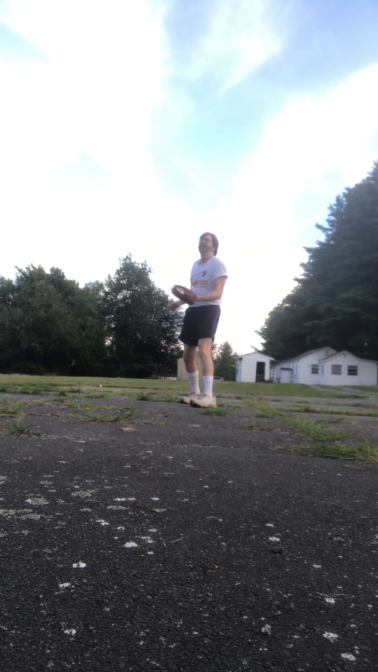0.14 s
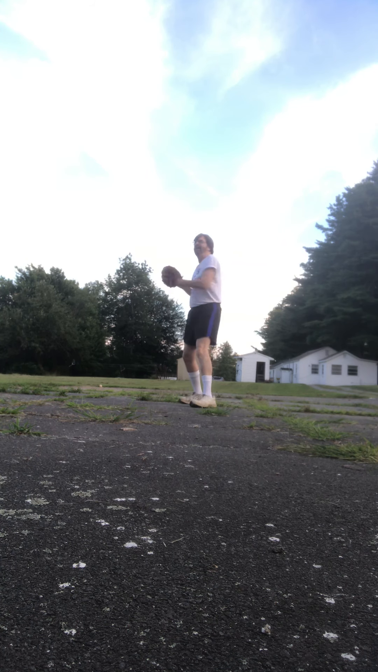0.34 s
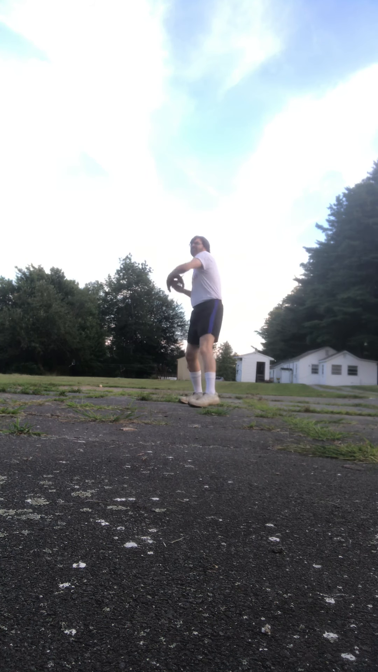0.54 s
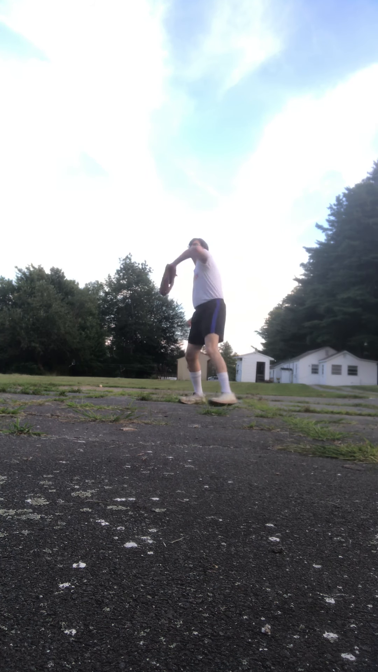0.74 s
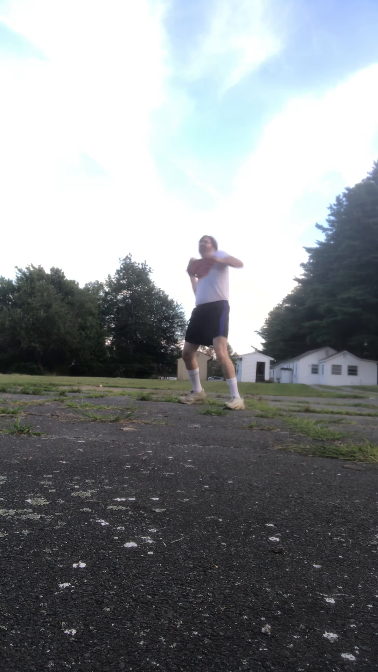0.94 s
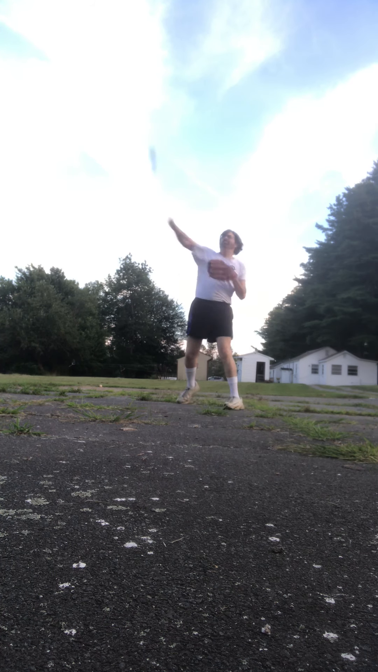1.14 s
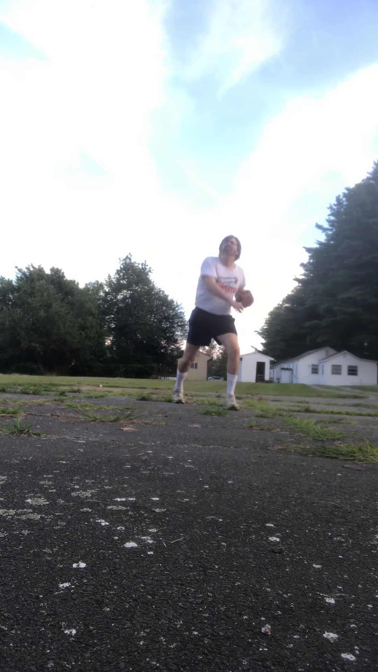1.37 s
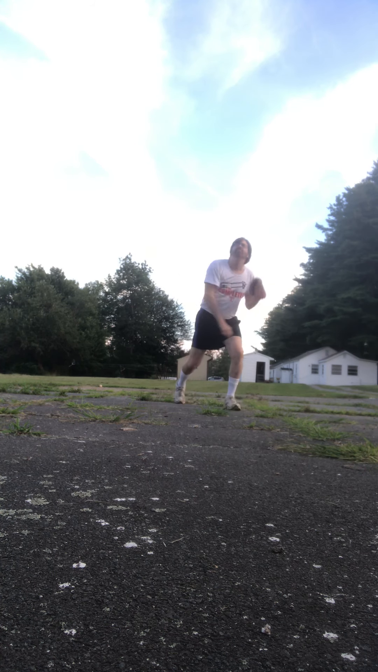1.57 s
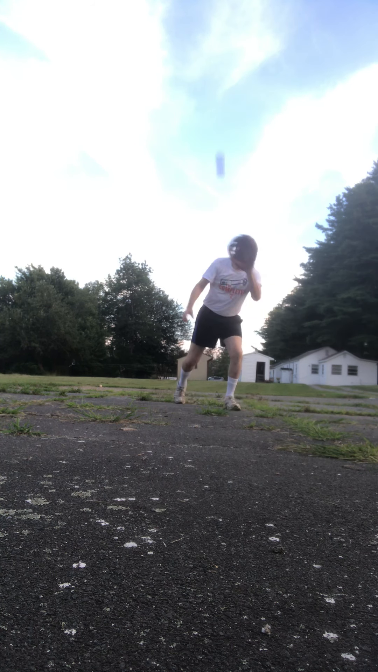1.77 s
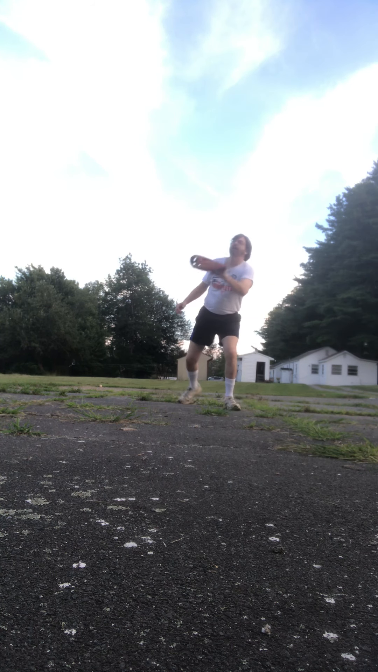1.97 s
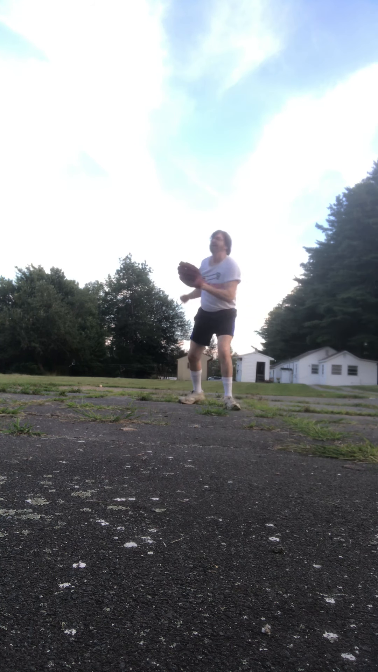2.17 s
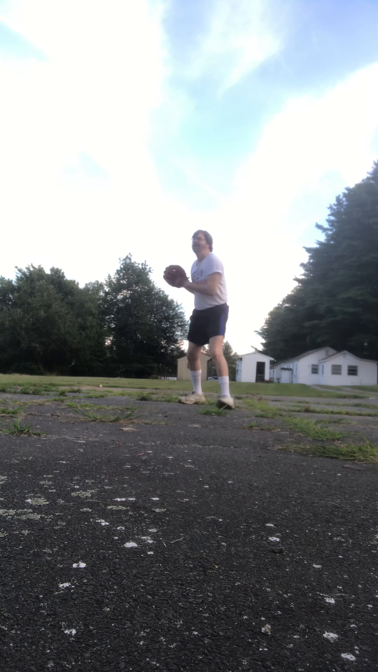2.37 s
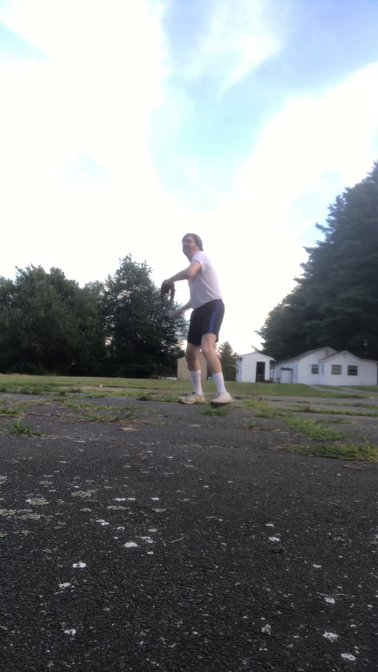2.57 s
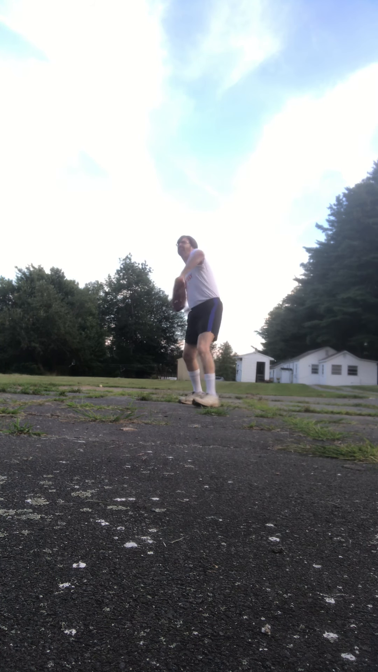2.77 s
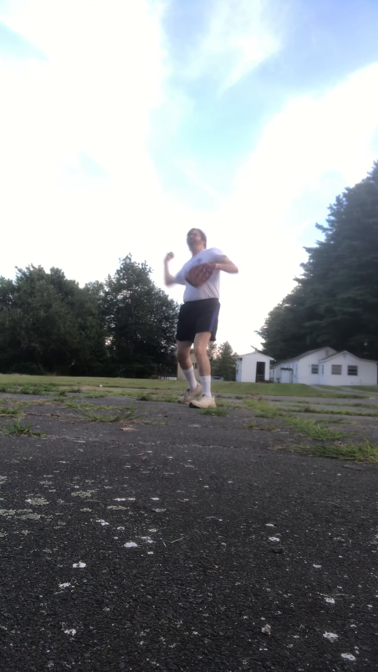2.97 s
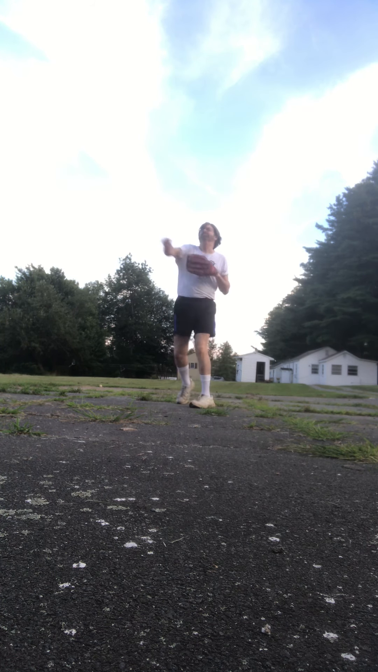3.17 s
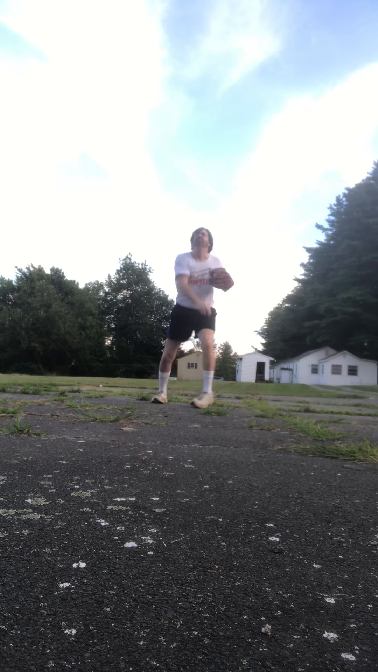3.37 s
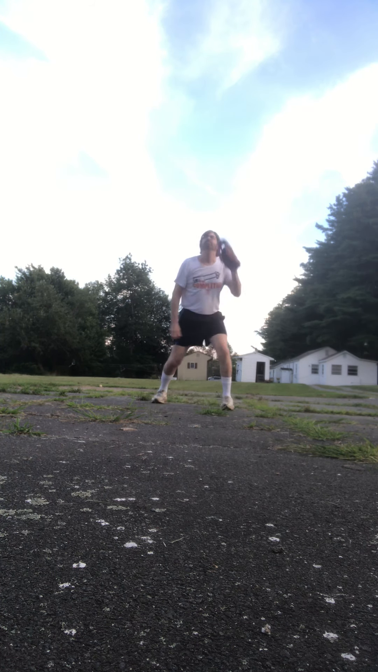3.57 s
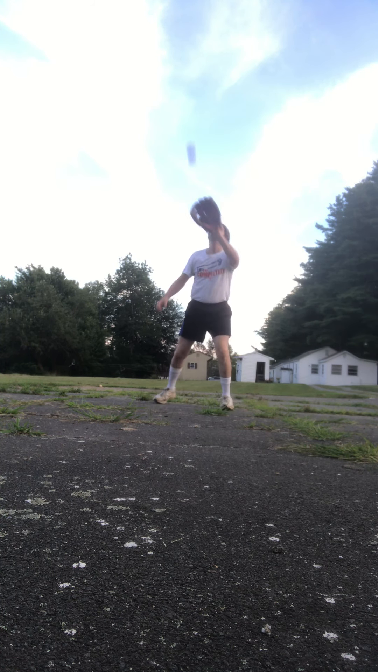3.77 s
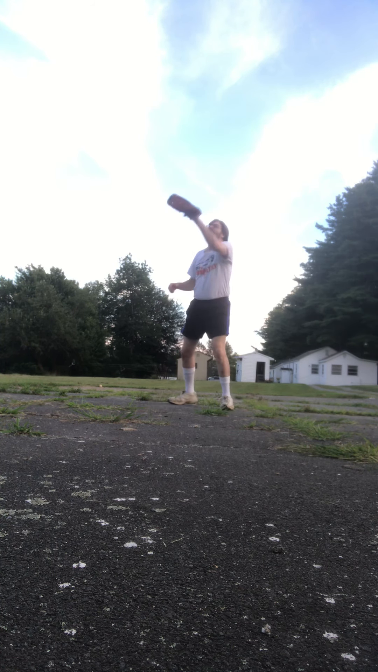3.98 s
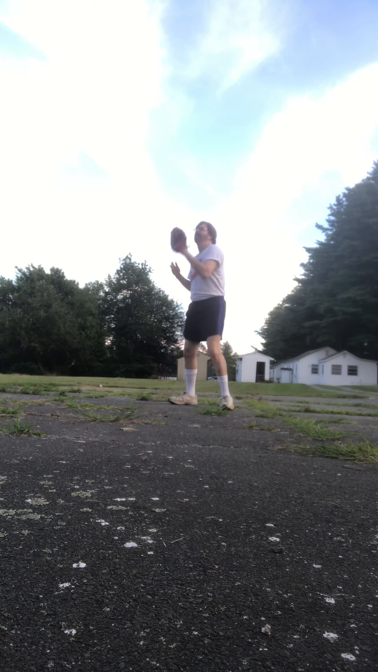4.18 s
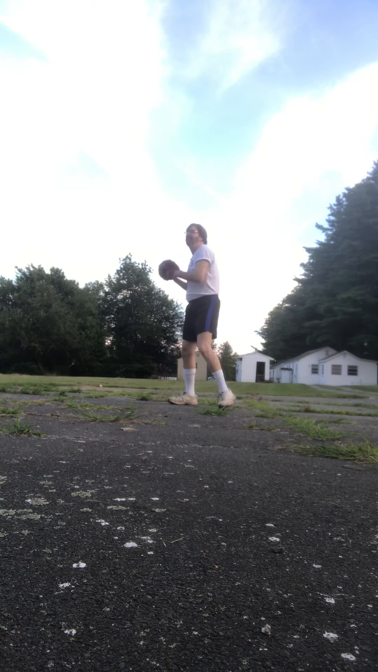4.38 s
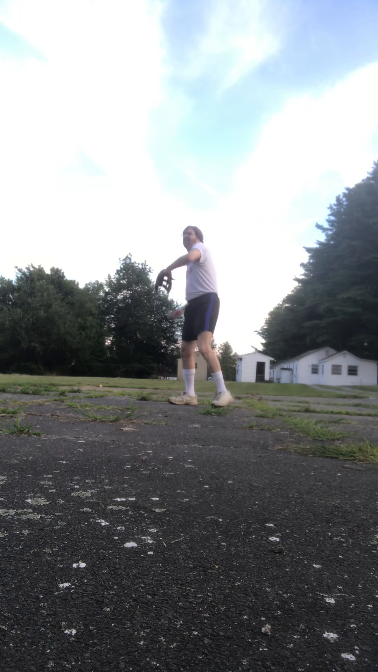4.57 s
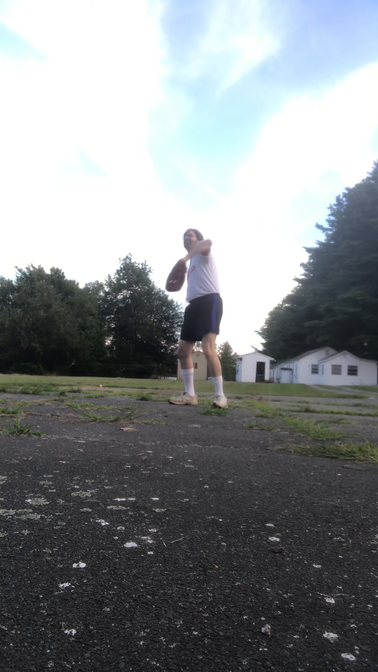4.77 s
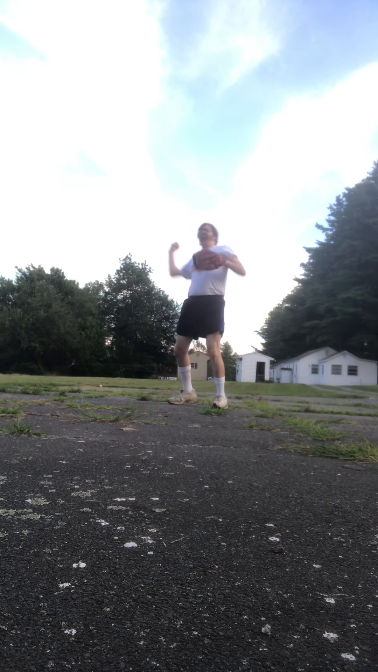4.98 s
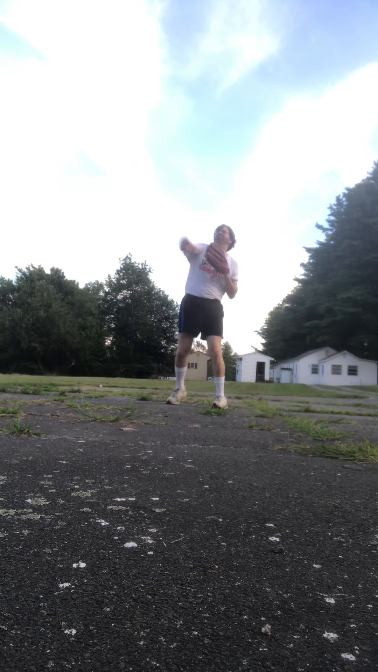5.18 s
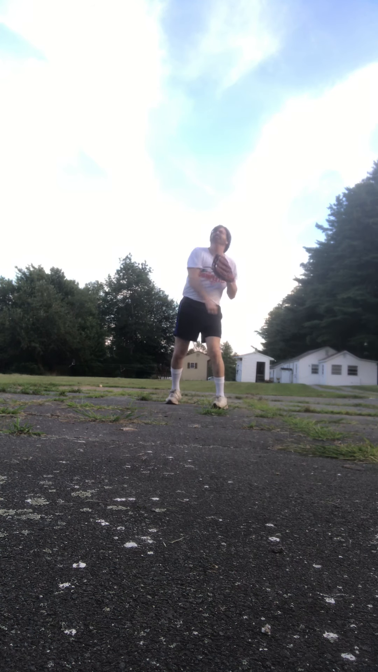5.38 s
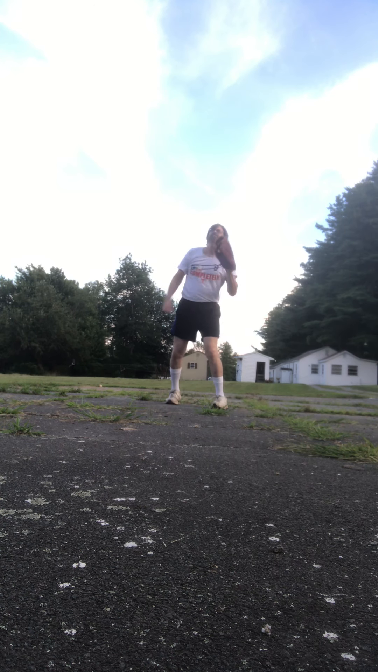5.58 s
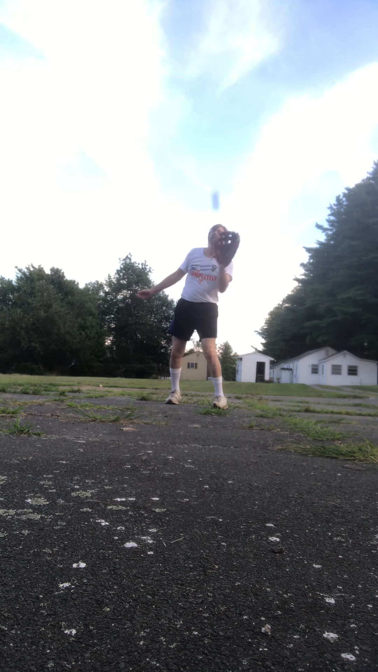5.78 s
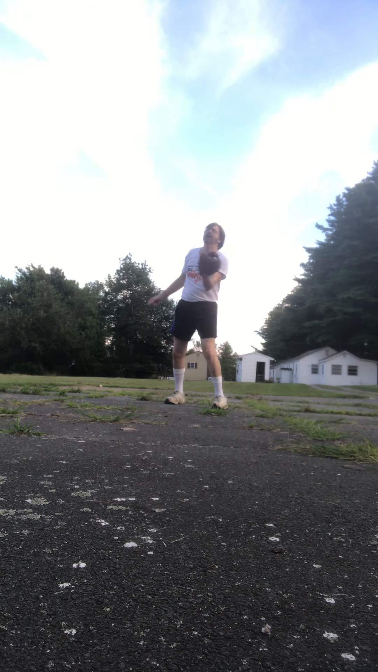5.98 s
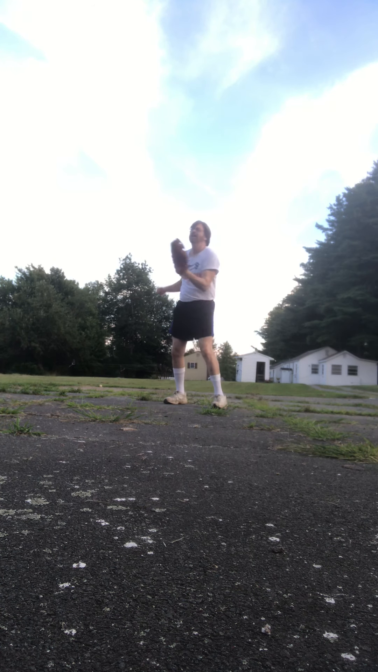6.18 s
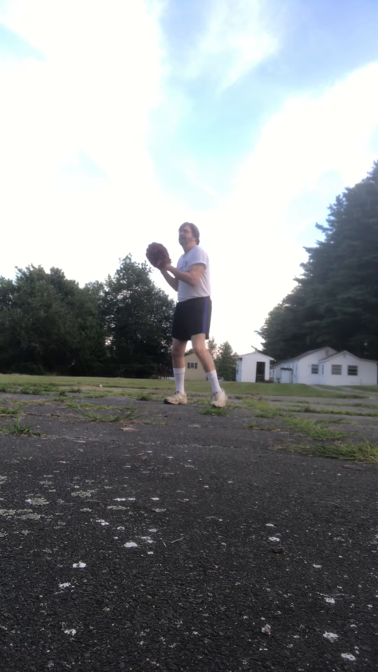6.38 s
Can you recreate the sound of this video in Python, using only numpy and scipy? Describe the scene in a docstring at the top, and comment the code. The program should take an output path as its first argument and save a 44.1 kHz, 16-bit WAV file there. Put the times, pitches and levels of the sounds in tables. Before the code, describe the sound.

Three hard throws bang off a panelled wall, each followed by a leather glove catch, with faint shoe scuffs on asphalt.

```python
"""Baseball against a wall

Three throws strike a nearby panelled wall, whose resonances crack and boom, and each rebound pops
in a leather glove. Far buildings and trees reflect the blows; shoes rasp by friction on gritty
asphalt. Behind it all are open air, a distant machine hum, insects and small birds."""
import sys
import numpy as np
from scipy import signal
from scipy.fft import rfft, irfft, next_fast_len
from scipy.io import wavfile
from scipy.ndimage import uniform_filter1d

SR = 44100
rng = np.random.default_rng(int(sys.argv[2]) if len(sys.argv) > 2 else 0)


def store_wav(level_fs):
    """Save 16-bit WAV to argv[1]."""
    pcm = np.round(np.clip(np.atleast_2d(level_fs), -1, 1) * 32767)
    wavfile.write(sys.argv[1], SR, pcm.T.astype(np.int16))


N = 283563
TIME = np.arange(N) / SR


def from_db(db):
    """Amplitude grows tenfold for every 20 dB."""
    return 10 ** (np.asarray(db) / 20)


def rms_one(x):
    """Normalisation to unit mean power."""
    return x / np.sqrt(np.mean(x ** 2) + 1e-20)


def at_hz(points, hz):
    """Interpolation of a spectrum on a log-frequency axis."""
    f, db = np.transpose(points)
    return np.interp(np.log(np.maximum(hz, 1)), np.log(f), db)


def noise(spectrum, size):
    """Spectral shaping turns white noise into coloured noise of rms 1."""
    gain = from_db(at_hz(spectrum, np.arange(size // 2 + 1) * SR / size))
    return rms_one(irfft(rfft(rng.standard_normal(size)) * gain, size))


def resonate(x, hz, width):
    """A two-pole resonator with unit peak gain and a bandwidth in Hz."""
    r = np.exp(-np.pi * width / SR)
    feedback = [1, -2 * r * np.cos(2 * np.pi * hz / SR), r * r]
    return signal.lfilter(np.array([1, 0, -1]) * (1 - r * r) / 2, feedback, x + 1e-18)


def narrow_noise(size, hz, width):
    """Two resonators in cascade narrow white noise to a wavering tone."""
    return resonate(resonate(rng.standard_normal(size), hz, width), hz, width)


def filtered(x, order, hz, kind):
    """A filter with a maximally flat passband."""
    return signal.sosfilt(signal.butter(order, hz, kind, fs=SR, output="sos"), x)


def fade(t, t60):
    """Exponential decay from t = 0, losing 60 dB in t60 seconds."""
    return (t >= 0) * np.exp(-np.log(1000) * np.maximum(t, 0) / t60)


def delay(x, s):
    """A linear phase shift delays a sound by s seconds."""
    size = next_fast_len(2 * len(x))
    hz = np.arange(size // 2 + 1) * SR / size
    return irfft(rfft(x, size) * np.exp(-2j * np.pi * hz * s), size)[:len(x)]


def add(out, s, sound):
    """Superposition: a sound joins the mix at time s."""
    start = max(round(s * SR), 0)
    out[start:start + len(sound)] += sound[:max(N - start, 0)]


def grains(depth_db):
    """Random amplitude modulation, a millisecond or two per grain."""
    return rms_one(from_db(depth_db * rms_one(uniform_filter1d(rng.standard_normal(N), size=70))))


def chirp(s, hz, half_s, arch):
    """A tone pulse under a bell-shaped envelope; its pitch arches around time s."""
    out, near = np.zeros(N), np.abs(TIME - s) < 4 * half_s
    u = (TIME[near] - s) / half_s
    pitch_hz = hz * (1 - arch * u * u)
    out[near] = np.exp(-u * u) * np.sin(2 * np.pi * np.cumsum(pitch_hz) / SR)
    return out


def chance_times(per_s):
    """Jittered timing: one moment falls at random in each equal slot."""
    times = (np.arange(40) + rng.random(40)) / per_s
    return times[times < N / SR]


# spectrum of the open air: frequency_hz, density_db
AIR_SPECTRUM = [(15, -54.5), (25, -19.5), (74, 2), (89, -12), (105, -17.5), (137, -5.5), (175, -17),
                (217, -15), (317, -19.5), (344, -13), (373, -23.5), (1100, -25), (3340, -39), (5430, -42),
                (16000, -53)]
# two bands of distant machinery, one of an insect chorus: pitch_hz, width_hz, level_db
DRONE_BANDS = [(73.6, 29, -55.5), (146.1, 6, -60.5), (5530, 970, -71.5)]
def ambience():
    """Distant sources merge into broadband noise, narrowband drones and a pure hum."""
    air = from_db(-50.5) * noise(AIR_SPECTRUM, N)
    drones = sum(from_db(db) * rms_one(narrow_noise(N + SR, hz, width)[SR:])
                 for hz, width, db in DRONE_BANDS)
    hum = from_db(-64.5) * np.sqrt(2) * np.sin(2 * np.pi * 350 * TIME)
    return air + drones + hum


# bouts of insect calls: start_s, end_s
CALL_BOUTS = [(.015, 3.3), (4.17, 8.1)]
def insect(period_s=.436):
    """Modulation by noise spreads evenly paced, high tone pulses into a narrow band."""
    flutter = rms_one(uniform_filter1d(rng.standard_normal(N), size=200))
    calls = np.concatenate([np.arange(start, end, period_s) for start, end in CALL_BOUTS])
    return from_db(-73.5) * flutter * sum(chirp(s, 8080, half_s=.04, arch=.015) for s in calls)


# chips of the nearest bird: centre_s, level_db
BIRD_CHIPS = [(0.169, -52.5), (.775, -54.5), (2.43, -57)]
def birds():
    """Amplitude modulation roughens the short chips of one near bird and a few far ones."""
    rough = grains(1.7)
    near = [(s, 5260, db) for s, db in BIRD_CHIPS]
    far = [(s, 4900 + 130 * rng.standard_normal(), -61) for s in chance_times(per_s=1.5)]
    return rough * sum(from_db(db) * chirp(s, hz, half_s=.0049, arch=.049) for s, hz, db in near + far)


# reflections from far buildings: delay_s, gain_db
BUILDING_ECHOES = [(.2888, -28.5), (.3526, -32.5), (.3735, -39)]
def far_echoes(x):
    """Reflection from buildings gives thin, distinct echoes; scattering by trees gives a soft smear."""
    thin = filtered(x, 2, [1000, 4500], "band")
    t = TIME[:SR * 3 // 5]
    trees = rng.standard_normal(len(t)) * np.exp(-((t - .375) / .065) ** 2)
    smear = signal.fftconvolve(thin, trees / np.sqrt(np.sum(trees ** 2)))[:N]
    return sum(from_db(db) * delay(thin, s) for s, db in BUILDING_ECHOES) + from_db(-35) * smear


def click(db, hz):
    """A small dry contact radiates a brief burst of noise around one broad resonance."""
    t = TIME[:SR // 16]
    crunch = noise([(300, 3.5), (1500, 3.5), (5000, -1), (8000, -7.5), (16000, -25.5)], len(t))
    rise = 1 - fade(t, .0041)
    decay = fade(t, .014) + from_db(-3.5) * fade(t, .028)
    return from_db(db - 1.5) * rms_one(resonate(crunch, hz, .41 * hz)) * rise * decay


def bump(db, hz, t60):
    """A single, heavily damped mode gives a soft knock."""
    t = TIME[:SR // 8]
    return from_db(db) * np.sin(2 * np.pi * hz * t) * fade(t, t60)


# dull bumps, as of feet landing: start_s, level_db, pitch_hz, t60_s
DULL_BUMPS = [(2.088, -43.5, 392, 0.04), (2.841, -39.5, 190, 0.053), (3.4989, -19.5, 470, 0.016),
              (3.605, -39, 200, 0.12)]
# small dry clicks of grit underfoot, and of the wall rattling just after the second throw:
# start_s, strength_db, pitch_hz
DRY_CLICKS = [(1.275, -41.5, 1446), (2.3065, -34, 1170), (2.367, -34.5, 5400), (2.837, -32, 1950),
              (3.279, -39, 1190), (3.312, -40, 1300), (3.497, -31.5, 1140), (3.5222, -35, 2680),
              (4.482, -37.5, 1110), (4.533, -36.5, 960), (4.8377, -41.5, 1500), (5.0773, -44, 920)]
def small_impacts():
    """Brief contacts: feet land, grit and the rattling wall click, and finer grit ticks at random."""
    out = np.zeros(N)
    for s, db, hz, t60 in DULL_BUMPS:
        add(out, s, bump(db, hz, t60))
    for s, db, hz in DRY_CLICKS:
        add(out, s, click(db, hz))
    for s in chance_times(per_s=4):
        offset_db, pitch = rng.standard_normal(2)
        add(out, s, click(-52 + offset_db, hz=2200 * 2 ** (.34 * pitch)))
    return out


# soles dragging on asphalt: centre_s, half_length_s, level_db, relative_hiss_db
SOLE_DRAGS = [(0.248, 0.087, -59, -8.5), (0.501, 0.019, -56, -20), (1.11, 0.036, -52, -19),
              (1.325, 0.054, -51, -12), (1.406, 0.02, -37, -15.5), (2.346, 0.065, -53, -5),
              (3.112, 0.027, -43, -8), (3.226, 0.025, -53, -1), (3.344, 0.021, -37.5, -14),
              (4.202, 0.03, -53.5, -24), (4.519, 0.019, -42.5, -10.5), (4.614, 0.036, -51.5, -4.5)]
def rubbing(db_per_octave=19, squareness=2.6, grain_limit=2.5):
    """Friction noise, a grainy rasp with hiss: soles, grit trickling off the wall, the closing glove."""
    rasp = noise([(200, -6.5), (500, 9.5), (1000, -2.5), (2500, -4), (4500, -5.5), (8000, -22),
                  (16000, -27)], N)
    hiss = noise([(1200, -19.5), (2500, -5), (4000, -4.5), (6500, 3), (9500, -10), (16000, -15)], N)
    # the lighter the drag, the higher its rasp
    soles = [(s, half_s, db, 920 * 2 ** ((-40.5 - db) / db_per_octave), hiss_db)
             for s, half_s, db, hiss_db in SOLE_DRAGS]
    debris = [(s + .084, .025, -57, 3200, -13.5) for s, *_ in WALL_HITS]
    grips = [(s + .11, .034, -55.5, 1775, -13.5) for s, *_ in GLOVE_HITS]
    out = np.zeros(N)
    for s, half_s, db, hz, hiss_db in soles + debris + grips:
        envelope = np.exp(-np.minimum(np.abs(TIME - s) / half_s, 10) ** squareness)
        out += from_db(db) * envelope * (rms_one(resonate(rasp, hz, .8 * hz)) + from_db(hiss_db) * hiss)
    stones_db = 5 * rng.exponential(1, N // 12 + 1).clip(0, 4)   # single stones snap past
    crackle = rms_one(from_db(np.repeat(stones_db, 12)[:N]))
    return out * rms_one(np.minimum(crackle * grains(3), grain_limit))


def glove_swish():
    """Two bands of noise swell into a hollow swish as the glove comes down after the first catch."""
    rub = rng.standard_normal(N)
    upper = resonate(resonate(rub, 3070, 600), 3040, 510)
    lower = resonate(resonate(rub, 1820, 500), 2030, 600)
    envelope = np.exp(-((TIME - 2.13) / .034) ** 2)
    return from_db(-49) * rms_one(upper + from_db(-1) * lower) * envelope


# the ball shifting after each catch: delay_s, level_db, pitch_hz, t60_s
BALL_SHIFTS = [(.031, -23.5, 364, 0.019), (0.049, -26, 270, 0.015), (.026, -34, 686, 0.032)]
def settling():
    """Secondary impacts: the caught ball ticks against the leather and drops into the pocket."""
    out = np.zeros(N)
    for (s, *_), (after_s, db, hz, t60) in zip(GLOVE_HITS, BALL_SHIFTS):
        add(out, s + after_s - .003, click(db=-41.5, hz=1300))
        add(out, s + after_s, bump(db, hz, t60))
    return out


def contact(t, grit_db, t60):
    """Contact force: a unit impulse, then a brief crunch of the touching surfaces."""
    crunch = filtered(rng.standard_normal(len(t)), 2, 2200, "high")
    return (t == 0) + from_db(grit_db) * crunch * fade(t, t60)


def lead_in(hz, width, t60):
    """A time-reversed decay of narrowband noise: a hollow tone swells for 25 ms before a blow."""
    t = TIME[:SR // 40]
    tone = rms_one(narrow_noise(SR // 10, hz, width)[-len(t):])
    return (tone * fade(t, t60))[::-1]


# spectrum of a blow's diffuse tail: frequency_hz, density_db
TAIL_SPECTRUM = [(60, -16), (150, 6), (400, -0.5), (700, -0.5), (1300, -4), (2200, -7), (4500, -16.5),
                 (7000, -22.5), (11000, -33), (16000, -36.5)]
def diffuse_noise(t):
    """A diffuse sound field behaves as coloured noise."""
    return noise(TAIL_SPECTRUM, len(t))


# points at which a blow's colour is given: frequency_hz
COLOUR_POINTS = [250, 620, 1150, 2000, 4500, 7000, 11000]
def body(force, modes, tuning, colour, polarity):
    """Modal sum, tuned and tinted by where the ball lands; like polarity leaves notches between modes."""
    tint = list(zip(COLOUR_POINTS, colour))
    return sum(polarity ** k * from_db(db + at_hz(tint, hz)) * resonate(force, hz * tuning, width)
               for k, (hz, width, db) in enumerate(modes))


# resonances of the glove's leather shell and padded pocket: untuned_hz, width_hz, gain_db
LEATHER_MODES = [(1000, 66, 19), (1420, 420, 12), (2320, 132, 18), (2910, 200, 8.5), (4410, 200, 3.5),
                 (7350, 670, -8), (11800, 3400, -11)]
POCKET_MODES = [(146, 85, 15), (257.3, 114, 24.8)]
# catches: start_s, strength_db, pocket_delay_ms, pocket_db, untuned_cavity_hz, ground_delay_ms,
# then colour_db at each of COLOUR_POINTS
GLOVE_HITS = [(1.8969, 0, 0.83, 1.65, 464, 1.92, -2.5, 2, -7, 2.5, 5.5, -23, -37),
              (3.8712, 0.021, 2.33, 1, 600, 1.75, 1, -2, 4.5, 7, -22, -17, -9),
              (5.8712, 0, 2.5, 6.8, 655, 2.6, 3, -2.5, -44, 12, 8, 2.5, 8)]
def catches():
    """Impact excitation: the ball grazes the web, slaps the leather and pops the pocket's cavity."""
    out, t = np.zeros(N), TIME[:SR // 4]
    for s, db, pocket_ms, pocket_db, cavity_hz, ground_ms, *colour in GLOVE_HITS:
        graze = body(contact(t, grit_db=-11, t60=.01), LEATHER_MODES, 1, colour, polarity=-1)
        slap = body(contact(t, grit_db=-12.5, t60=.012), LEATHER_MODES, .96, colour, polarity=.75)
        modes = POCKET_MODES + [(cavity_hz, 130, 24)]
        thud = from_db(pocket_db) * body(-1.0 * (t == 0), modes, .84, colour, polarity=.85)
        thud = filtered(thud, 4, 950, "low")   # padding softens the blow
        thud = filtered(thud, 2, 85, "high")   # a glove is too small to radiate deep bass
        pop = slap + delay(thud, pocket_ms / 1000)
        reflection = from_db(-10) * delay(pop, ground_ms / 1000)
        tail = from_db(-31.5) * diffuse_noise(t) * fade(t, .13)
        whistle = lead_in(hz=3080, width=380, t60=.055)
        add(out, s - len(whistle) / SR, from_db(db - 41) * whistle)
        add(out, s - .00117, from_db(db - 16) * graze)
        add(out, s, from_db(db) * (pop + reflection + tail))
    return out


# low modes of the wall panel: pitch_hz, level_db, t60_s
PANEL_MODES = [(145, -23.5, .43), (149, -21, .1), (237, -41, .22), (342, -41, .18)]
def panel_boom(t, peak_s=.0245, build_s=.0055):
    """The low modes build up as a bending wave spreads over the panel, then decay."""
    u = t - peak_s
    ring = sum(from_db(db) * np.sin(2 * np.pi * hz * u) * fade(np.abs(u), t60)
               for hz, db, t60 in PANEL_MODES)
    return ring * (1 + np.tanh(u / build_s)) / 2


# resonances of the ball's crack on the wall: untuned_hz, width_hz, gain_db
CRACK_MODES = [(141, 48, 31.5), (300, 55, 15.5), (374, 68, 14), (602, 73, 25), (780, 96, 24),
               (1200, 130, 15.5), (1398, 190, 23.5), (1795, 260, 28.5), (2640, 460, 19.5), (3660, 960, 18),
               (4500, 470, 20), (6360, 590, 10.5), (10150, 800, 0), (12100, 810, -8), (14200, 1800, -18.5)]
# throws: start_s, strength_db, tuning_ratio, ground_delay_ms, lead_in_hz, lead_in_db,
# then colour_db at each of COLOUR_POINTS
WALL_HITS = [(1.4234, 0.41, 1, 1.48, 660, -19.5, -1.1, -0.5, 2, -2, 1.2, -1, 0.5),
             (3.3979, 0.41, 1, 1.58, 900, -20, 0.65, 3, 5.1, -9, -1, 9, 12),
             (5.3932, 0.42, 1.01, 1.52, 1173, -24, -1.8, -4.5, 1.5, -1.5, 2.5, 5, -3.5)]
def wall_hits(slap_back_s=.017):
    """A hard impact excites the wall's modes; the loose panel slaps back, rattles and booms."""
    out, t = np.zeros(N), TIME[:SR * 3 // 5]
    for s, db, tuning, ground_ms, lead_hz, lead_db, *colour in WALL_HITS:
        crack = body(contact(t, grit_db=-21.5, t60=.0096), CRACK_MODES, tuning, colour, polarity=-.96)
        dulled = filtered(crack, 1, 5000, "low")   # rough asphalt reflects less treble
        reflection = from_db(-9.5) * delay(dulled, ground_ms / 1000)
        envelope = from_db(-21.5) * fade(t, .059) + from_db(-29.5) * fade(t - slap_back_s, .098)
        rattle = diffuse_noise(t) * grains(.83)[:len(t)] * envelope
        add(out, s, from_db(db) * (crack + reflection + panel_boom(t) + rattle))
        # a few cycles of a hollow tone lead into the crack
        out += from_db(db + lead_db) * chirp(s - .002, lead_hz, half_s=.002, arch=0)
        swell = lead_in(hz=1200, width=1805, t60=.016)
        add(out, s - len(swell) / SR, from_db(db - 22.5) * swell)
    return out


def scene():
    """Superposition of the blows, their echoes, the small sounds and the background in one channel."""
    wall, glove = wall_hits(), catches()
    echoes = far_echoes(wall + from_db(-9) * glove)
    small_sounds = rubbing() + glove_swish() + settling()
    background = ambience() + insect() + birds()
    return (background + small_impacts() + small_sounds + echoes + glove + wall)[None]


def record(dry):
    """Soft saturation rounds the loudest peaks; a steep low-pass cuts the highest treble."""
    ceiling, stopband_hz = 1.6, 17200
    rounded = ceiling * np.tanh(dry / ceiling)
    return signal.sosfilt(signal.cheby2(14, 70, stopband_hz, fs=SR, output="sos"), rounded)


dry = scene()
out = record(dry)
store_wav(out)
```